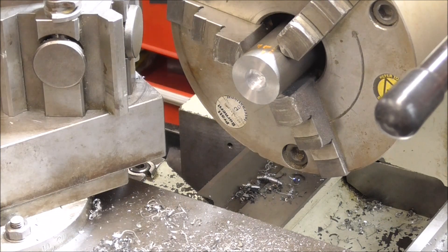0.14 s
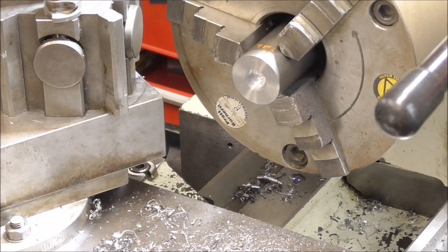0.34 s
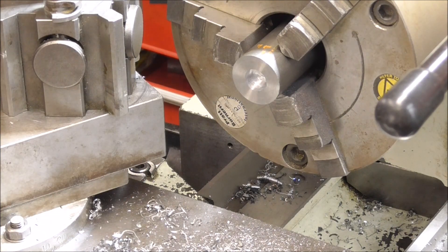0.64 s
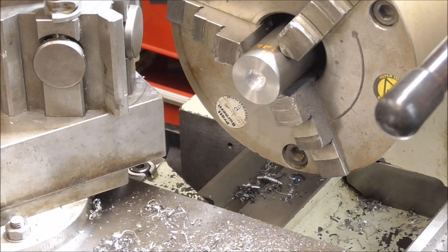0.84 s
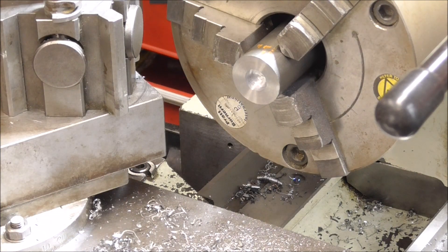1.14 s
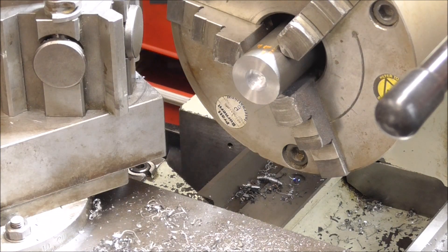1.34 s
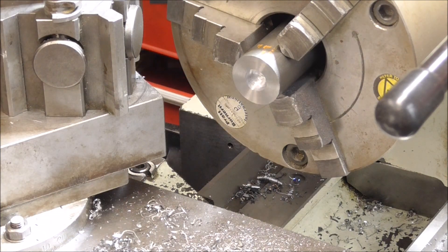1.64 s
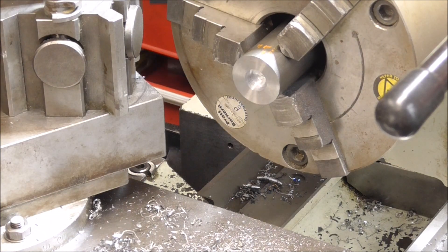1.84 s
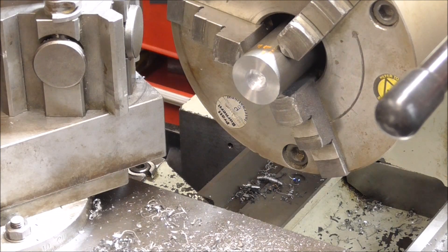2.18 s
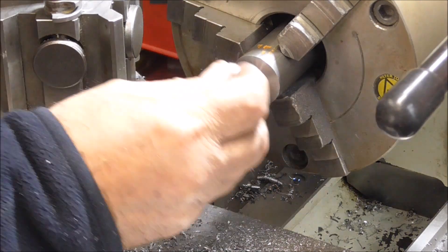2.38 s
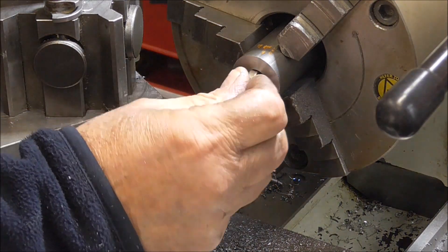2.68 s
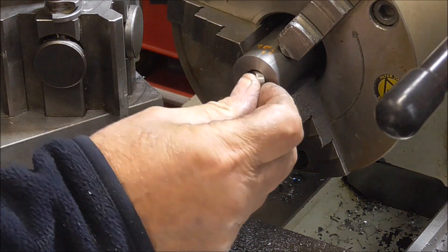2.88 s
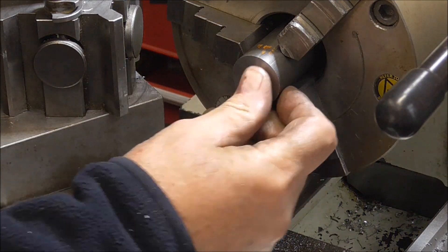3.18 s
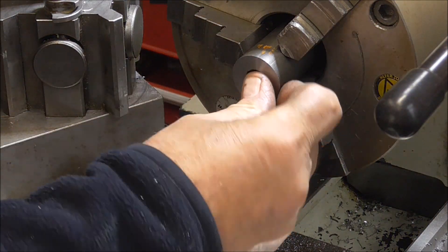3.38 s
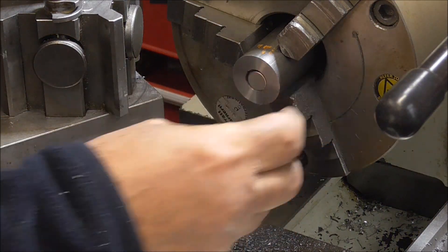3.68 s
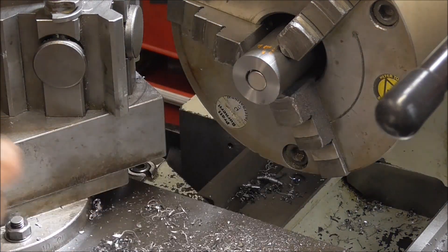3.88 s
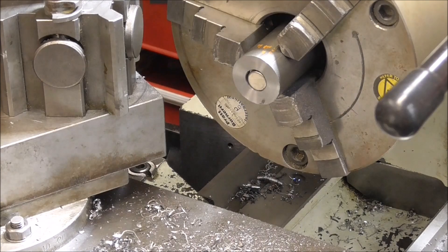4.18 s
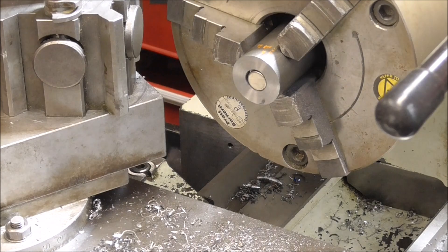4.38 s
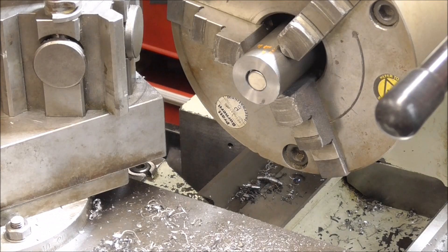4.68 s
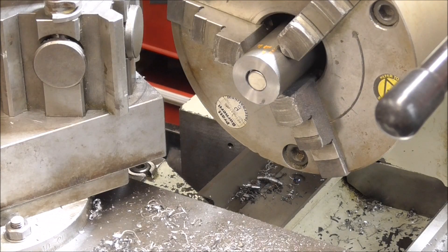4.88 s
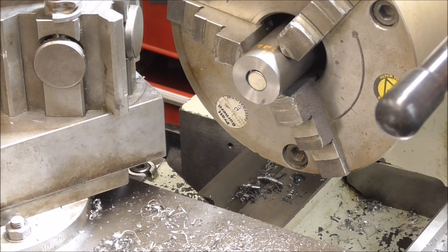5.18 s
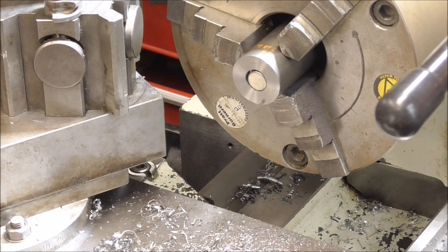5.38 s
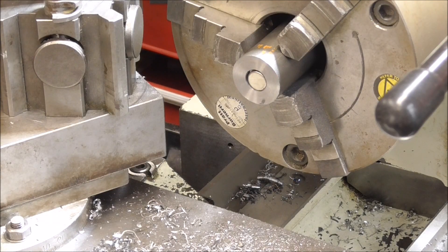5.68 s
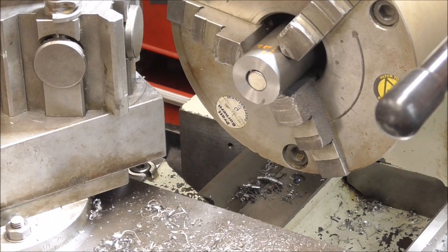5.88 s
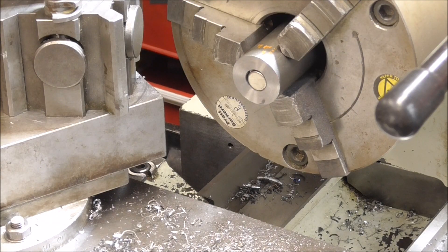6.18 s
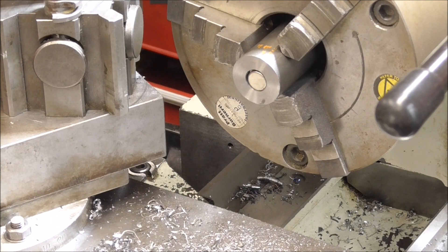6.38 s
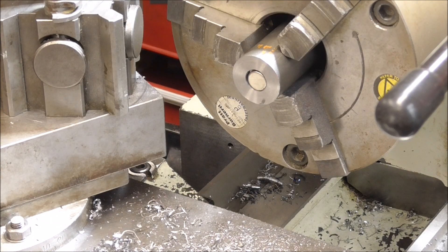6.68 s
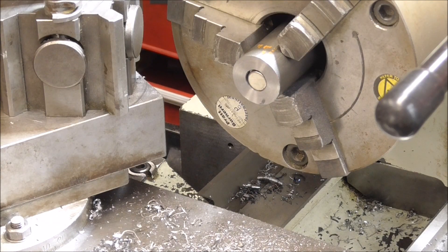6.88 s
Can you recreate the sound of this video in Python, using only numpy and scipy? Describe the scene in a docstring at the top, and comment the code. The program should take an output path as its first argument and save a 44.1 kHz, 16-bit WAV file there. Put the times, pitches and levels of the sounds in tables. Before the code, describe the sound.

A steady, low electric hum near 200 hertz fills the whole seven seconds, close by in a small, dry home workshop. Buzzing overtones beat slowly against one another, over a soft mid-range whirr and light microphone hiss; some upper tones swell gently in the second half. At about 0.2 seconds comes a faint tap, then between 0.33 and 0.45 a rough, dry clatter of loose steel tools, with weaker knocks around 0.55 to 0.6. A tiny tick and a dull soft knock occur near 1.5 to 1.6. While a hand fits a small metal piece into the stationary workpiece, minute bright chip ticks appear from 2.5 to 3.4, the sharpest at 3.0. A very faint, thin high ping sounds near 4.95 and one last tiny tick at 5.7. The hum persists unchanged to the end.

```python
"""A small electric motor hums steadily close at hand in a home workshop, with slow beats in its overtones.
The hum is a sum of sines at, or just under, multiples of a third of the mains frequency, over filtered-noise
whirr and hiss. Loose steel tools rattle on the bench early on, as bursts of damped modes in a short room; tiny
ticks of metal chips, millisecond noise bursts, and one thin ping follow. A limiter dips the level after sharp treble."""
import sys
import numpy as np
from scipy import signal
from scipy.fft import rfft, irfft
from scipy.io import wavfile
from scipy.ndimage import uniform_filter1d, minimum_filter1d

SR = 44100
rng = np.random.default_rng(int(sys.argv[2]) if len(sys.argv) > 2 else 0)


def int16_out(signal):
    """Quantize to a 16-bit WAV file."""
    q = np.round(np.clip(np.atleast_2d(signal).T, -1, 1) * 32767)
    wavfile.write(sys.argv[1], SR, q.astype(np.int16))


def linear_from_db(decibels):
    """Turn decibels (scalar or array-like) into linear amplitude factors; 0 gives 1."""
    return 10 ** (np.asarray(decibels, float) / 20)


N = 310023  # samples

# Base rate of the hum, one third of the mains frequency. Each row: time in seconds, rate in Hz.
BASE_RATE = [(0.0, 16.6336), (1.0, 16.6346), (2.0, 16.6362), (3.0, 16.637), (4.0, 16.6362), (5.0, 16.6363),
             (6.0, 16.6362), (7.0, 16.6372)]
# Strong hum lines at multiples of the base rate. Each row: multiple of the base rate, level in dB rms,
# left-right difference in dB, lead of the left channel in radians.
HUM = [(12, -49.4, 0, 0), (15, -85.8, 0, 0), (16, -77.7, 0, 0), (24, -67.0, -0.4, 0.1),
       (32, -85.3, -1.7, -0.3), (36, -74.1, 0.6, -0.5), (48, -67.7, 3.6, -0.1), (57, -86.5, -1.8, 0),
       (60, -64.1, -1.9, 0), (72, -74.9, -0.8, 0.4), (84, -73.8, -4.3, 0.1), (87, -84.3, -3.9, -0.2),
       (93, -85.7, 1.0, 0), (96, -85.2, -22.1, 2.1), (99, -84.9, -3.7, 0), (108, -76.2, -1.2, 0.3),
       (120, -79.9, -0.2, 0.1), (132, -80.8, -4.8, -1.3), (144, -87.7, 6.3, 0), (156, -88.0, 4.8, -0.7),
       (168, -89.3, 0.7, -0.5), (180, -94, -3, 0), (192, -93.9, 1.2, -0.2), (228, -92.5, -10.3, -0.3),
       (252, -85.6, -2.0, -0.2), (276, -93.5, -5.8, -0.3), (300, -92.5, -1.8, 0.2)]
# Lines just under a multiple of the base rate; most beat with the line there, some stand alone.
# Each row: multiple of the base rate, steps of the slip rate below it, level in dB rms,
# time in step with the multiple in seconds, left-right difference in dB.
LOW_LINES = [(30, 1, -74.7, 3.47, -1.3), (60, 3, -77.3, 4.0, -2.2), (69, 3, -85.5, 3.64, -2.3),
             (84, 3, -76.5, 3.21, -1.2), (90, 3, -86.5, 3.87, -7.2), (93, 3, -84.5, 3.59, 0.6),
             (96, 3, -72.0, 3.69, -3.1), (99, 3, -83.5, 3.59, -3.2), (102, 3, -88, 3.63, -1.3),
             (108, 3, -74.9, 3.96, -6.5), (114, 3, -85.5, 3.55, -1.4), (120, 3, -73.6, 4.08, -4.8),
             (120, 4, -85.3, 3.79, -4.2), (156, 3, -93, 3.73, -5.3), (168, 3, -82, 3.49, 0.2),
             (168, 6, -87.5, 3.45, 0.2)]
# Slipping lines that swell together. Each row: multiple of the base rate, level in dB from the common swell.
SWELL_LINES = [(99, -9), (105, 0), (111, -8), (117, -11)]

HUM_MULTIPLE = 12  # base cycles to one cycle period of the base: the 200 Hz mains hum tone
BURST_DELAY = 0.8  # share of a hum tone cycle
SLIP_HZ, MAIN_STEPS = 0.2565, 3  # one step of slip; most slipping lines lie this many steps down
FAINT_SIDE_DB, FAINT_LEAD = -2, -0.22  # left-right dB and left lead in rad of bearing and faint lines


def read(points, hz, column=1):
    """Linear interpolation of a spectrum table along a log-frequency axis."""
    table = np.array(points)
    return np.interp(np.log(hz + 1), np.log(table[:, 0] + 1), table[:, column])


def add(mix, s, sound, balance_db):
    """Superposition: a sound is laid into both channels with a level difference between them."""
    part = mix[:, round(s * SR):][:, :len(sound)]
    gains = linear_from_db(np.array([[balance_db / 2], [-balance_db / 2]]))
    part += gains * sound[:part.shape[1]]


def base_angle():
    """Phase is the time integral of frequency: the phase of the base rate in radians at every sample."""
    rate_hz = np.interp(np.arange(N) / SR, *np.transpose(BASE_RATE))
    return 2 * np.pi * np.cumsum(rate_hz) / SR


def tone(angle, db, balance_db, lead, waver_db=0.93):
    """Slow amplitude modulation of a sine that reaches two ports with differing level and phase."""
    knots = uniform_filter1d(rng.standard_normal(80), size=3) * np.sqrt(3)
    waver = np.interp(np.arange(N), np.linspace(0, N, len(knots)), linear_from_db(waver_db * knots))
    phasor = (waver * np.exp(1j * angle).astype(np.complex64)) * np.sqrt(2) * linear_from_db(db)
    left = linear_from_db(balance_db / 2) * np.exp(0.5j * lead)
    right = linear_from_db(-balance_db / 2) * np.exp(-0.5j * lead)
    # the stated level is that of the mean of both channels
    return np.array([(phasor * left).imag, (phasor * right).imag]) * 2 / abs(left + right)


def faint(angle, db):
    """Random scatter: a weak line whose level and phase lead vary about the rule."""
    level_scatter, _, lead_scatter = rng.standard_normal(size=3)
    return tone(angle, db + 3.0 * level_scatter, FAINT_SIDE_DB, FAINT_LEAD + 0.26 * lead_scatter)


def starting_phases():
    """Phase coherence: overtones loosely aligned in phase gather into one burst in every hum tone cycle."""
    # the burst falls near the trough of the hum tone
    burst = -2 * np.pi * BURST_DELAY * (np.arange(1000) / HUM_MULTIPLE - 1)
    chance = rng.standard_normal(1000)
    start = burst + 1.52 * chance  # rad of looseness
    slipping = burst + 0.4 * chance  # tighter: a flutter at a quarter of the hum tone's frequency
    for k, steps, _, in_step_s, _ in LOW_LINES:
        if steps == MAIN_STEPS:  # sets the phase that the low line has at its time in step
            start[k] = slipping[k] - 2 * np.pi * MAIN_STEPS * SLIP_HZ * in_step_s
    return start, slipping


def hum(base, start):
    """Harmonic synthesis: mains hum and its overtones are sines at exact multiples of one base rate."""
    early_lines = 60, 84, 108  # multiples that start 3 dB louder and settle
    early = linear_from_db(np.interp(np.arange(N) / SR, [0.76, 2.4], [3.0, 0]))
    out = np.zeros((2, N))
    for k, db, side, lead in HUM:
        waver_db = 0 if k == HUM_MULTIPLE else 0.93  # the hum tone itself is steady
        line = tone(k * base + start[k], db, side, lead, waver_db)
        out += line * early if k in early_lines else line
    return out


def low_lines(base, start):
    """Beating: a line just under a multiple drifts in and out of phase with any line that stands there."""
    t = np.arange(N) / SR
    out = np.zeros((2, N))
    for k, steps, db, in_step_s, side in LOW_LINES:
        lag = 2 * np.pi * steps * SLIP_HZ * (t - in_step_s)
        out += tone(k * base + start[k] - lag, db, side, 0.1)
    return out


def swelling_lines(base, slipping):
    """Common amplitude modulation: one envelope raises and lowers a group of slipping lines."""
    # Level of a line at 0 dB from the swell. Each row: time in seconds, level in dB rms.
    swell_levels = [(0, -84), (1, -82), (2.4, -88), (3.5, -86), (4.2, -78.5), (5.2, -77), (6.4, -73.5),
                    (7, -75)]
    t = np.arange(N) / SR
    lag = 2 * np.pi * MAIN_STEPS * SLIP_HZ * t
    lines = sum(tone(k * base + slipping[k] - lag, db, -1.2, -0.7) for k, db in SWELL_LINES)
    return linear_from_db(np.interp(t, *np.transpose(swell_levels))) * lines


def bearing_whine(base, start):
    """Ball-pass harmonics: balls passing a bearing race give lines at multiples of the ball rate."""
    # The clearest lines. Each row: multiple of the ball rate, level in dB rms.
    clear_lines = [(17, -97.6), (35, -96.8), (37, -91.3), (38, -97.5)]
    balls = 9.2711 * base  # ball rate in base rates
    # start[-k] takes phases from the far end of the list
    out = sum(tone(k * balls + start[-k], db, FAINT_SIDE_DB, FAINT_LEAD) for k, db in clear_lines)
    for k in range(31, 56):
        if k not in dict(clear_lines):
            out += faint(k * balls + start[-k], -103.0)
    return out


def faint_overtones(base, start):
    """Harmonic series: weak lines at multiples of the hum tone and of a quarter of it, the mains frequency."""
    # Mean levels at the hum tone's multiples. Each row: frequency in Hz, level in dB rms.
    hum_levels = [(3000, -96.5), (5400, -99), (6000, -104), (9000, -106), (13000, -107), (15000, -104)]
    # Mean levels at the mains multiples. Each row: frequency in Hz, level in dB rms.
    mains_levels = [(350, -93), (550, -88), (1100, -93), (1500, -88), (1900, -96), (2100, -100),
                    (2850, -94), (3150, -108), (3700, -108), (4000, -102)]
    strong = [row[0] for row in HUM + LOW_LINES + SWELL_LINES]
    mains = [k for k in range(21, 246, 3) if k % HUM_MULTIPLE and k not in strong]
    overtones = [k for k in range(HUM_MULTIPLE, 950, HUM_MULTIPLE) if k not in strong]
    out = np.zeros((2, N))
    for multiples, levels in (mains, mains_levels), (overtones, hum_levels):
        for k in multiples:
            out += faint(k * base + start[k], read(levels, k * BASE_RATE[0][1]))
    return out


def motor():
    """Superposition of lines that all derive from one base phase; some slip slowly behind its multiples."""
    base = base_angle()
    start, slipping = starting_phases()
    out = hum(base, start) + low_lines(base, start)
    out += swelling_lines(base, slipping)
    return out + bearing_whine(base, start) + faint_overtones(base, start)


def whirr():
    """Resonant filtering: air and bearing noise shaped by the housing, coherent between both ports."""
    # Noise density before the housing. Each row: frequency in Hz, level in dB per Hz.
    density = [(25, -113), (100, -111), (180, -103), (300, -104), (450, -102), (900, -103), (1700, -104),
               (2300, -108), (2900, -113), (3500, -125), (5000, -124), (9000, -127), (10500, -134),
               (15500, -132)]
    # Housing response, lifts and one dip. Each row: centre in Hz, width in Hz, gain in dB.
    housing = [(715, 44, 4), (1040, 110, 2.5), (1382, 230, 6.5), (2000, 230, 5), (2066, 59, -5),
               (4000, 250, 7.5), (5770, 1300, 1.5), (8850, 920, 6.5)]
    # Port difference. Each row: frequency in Hz, left-right difference in dB, left lead in radians.
    stereo = [(193, 8.5, 0), (690, 2, -0.33), (1300, -6, -.2), (2960, -5, 0.048), (11930, -4.5, -0.31)]
    hz = np.fft.rfftfreq(N, 1 / SR)
    noise = rfft(rng.standard_normal(N)) * np.sqrt(SR / 2)
    lift_db = sum(db / (1 + (2 * (hz - f) / width) ** 2) for f, width, db in housing)
    shared = noise * linear_from_db(read(density, hz) + lift_db)
    tilt = linear_from_db(read(stereo, hz) / 2) * np.exp(0.5j * read(stereo, hz, column=2))
    # throb at the hum tone's frequency
    throb = 1 + 0.08 * np.cos(HUM_MULTIPLE * base_angle() - 2 * np.pi * BURST_DELAY)
    return throb * irfft(np.array([shared * tilt, shared / tilt]), N)


def hiss():
    """Uncorrelated noise: microphone hiss is independent in left and right."""
    # Noise density. Each row: frequency in Hz, level in dB per Hz.
    density = [(25, -110), (100, -110), (250, -112), (600, -108), (1500, -107), (2500, -113), (3500, -122),
               (8000, -123), (11000, -125), (15500, -123)]
    noise = rfft(rng.standard_normal((2, N))) * np.sqrt(SR / 2)
    return irfft(noise * linear_from_db(read(density, np.fft.rfftfreq(N, 1 / SR))), N)


def tool(mix):
    """Modal excitation: each knock chatters in tiny bounces, ringing modes near its colour in a rough burst."""
    # Modes of the loose steel tools. Each row: nominal frequency in Hz, relative level in dB,
    # undamped 60 dB decay time in seconds.
    modes = [(633, 18, 0.049), (1143, 10, 0.054), (1575, -1, 0.11), (1750, 2, 0.079), (2290, -3, 0.16),
             (2800, 2.5, 0.061), (3120, -9, 0.053), (4080, -15, 0.095), (5070, -22, 0.014),
             (6570, -19, 0.1), (6550, -11, 0.069), (7780, -16.5, 0.12), (9000, -9, 0.038),
             (11140, -8, 0.046), (14600, -11, .03)]
    # Knocks and rattles. Each row: start in seconds, level in dB (6 dB over the rms of the first 200 samples),
    # centre of the blow's colour in Hz, width in octaves.
    knocks = [(.181, -53.5, 795, 0.28), (.185, -55, 1800, .2), (.3337, -44.5, 6400, 1.1),
              (.335, -44.5, 3170, 0.91), (.346, -45, 2500, .5), (0.3802, -44.5, 6000, 1.27),
              (0.384, -38, 1770, 0.43), (.393, -46, 2000, .58), (.403, -41, 1750, 0.9),
              (0.409, -49, 6000, 0.82), (0.418, -41.5, 1300, 0.51), (0.426, -54, 2400, .5),
              (0.43, -56, 1830, 0.51), (.45, -66, 2000, 0.35), (.55, -55, 1300, 0.71),
              (.585, -52.5, 990, 0.45), (.612, -56, 1100, 0.36), (1.616, -56.5, 500, 0.55)]
    damping = 0.64  # the bench shortens every decay time by this factor
    bounces_per_s = 400
    t = np.arange(SR // 5) / SR
    bins = np.fft.rfftfreq(len(t), 1 / SR) + 1
    high_pass = signal.butter(2, 300, 'high', fs=SR)
    for s, db, centre_hz, octaves in knocks:
        ring = np.zeros(len(t))
        for hz, mode_db, t60 in modes:
            reach = np.exp(-0.5 * (np.log2(hz / centre_hz) / octaves) ** 2)
            rough = 1 + 0.62 * uniform_filter1d(rng.standard_normal(len(t)), size=60) * np.sqrt(60)
            turns = hz * rng.uniform(0.92, 1.04) * t
            decay = linear_from_db(mode_db - 60 * t / (t60 * damping))
            ring += reach * decay * rough * np.sin(2 * np.pi * turns)
        colour = np.exp(-0.5 * (np.log2(bins / centre_hz) / octaves) ** 2) * (bins > 400)
        burst = irfft(rfft(rng.standard_normal(len(t))) * colour, len(t))
        burst_decay = linear_from_db(-60 * t / (0.065 * damping))
        ring += 0.71 * burst * burst_decay * np.std(ring[:200]) / np.std(burst)
        struck = rng.random(len(t)) < bounces_per_s / SR
        bounces = struck * rng.random(len(t)) * np.exp(-t / 0.02) * 0.59
        bounces[0] = 1
        ring *= np.minimum(t * centre_hz / 0.98, 1)  # dull blows start softer
        chatter = signal.fftconvolve(ring, bounces)[:len(t)]
        chatter = signal.lfilter(*high_pass, chatter)
        add(mix, s, linear_from_db(db) * chatter / np.std(chatter[:200]) / 2, -1.3)
    return mix


def workshop(x):
    """Diffuse reverberation: a short cluttered room as decaying noise, independent in each channel."""
    t = np.arange(SR // 3) / SR
    t60 = 0.07  # s
    tail = rng.standard_normal((2, len(t))) * linear_from_db(-60 * t / t60) * (t > 0.003)
    return signal.fftconvolve(x, tail / np.linalg.norm(tail[0]), axes=1)[:, :N]


def chips(mix):
    """Time-bandwidth reciprocity: ticks are treble bursts, narrow ones rising slower; the ping is one mode."""
    # Dry ticks of metal chips. Each row: start in seconds, peak in dB, centre in Hz, width in Hz,
    # left-right difference in dB.
    ticks = [(1.5415, -57, 9500, 9000, -1), (1.542, -66, 6400, 800, -1), (2.497, -62, 13000, 4000, -.5),
             (2.7195, -71, 11000, 4000, -.5), (2.7455, -58.5, 12500, 7000, 5),
             (2.9455, -66, 12500, 5000, -.5), (2.952, -69, 12300, 1500, -.5),
             (3.0185, -55.5, 10500, 2000, 4), (3.020, -43, 13100, 2070, -1), (3.023, -60, 14500, 2500, 8),
             (3.021, -58, 7300, 1500, -4), (3.406, -63, 13000, 6000, 0), (5.685, -68, 12500, 6000, 0)]
    # A chip that sings. Each row: start in seconds, level in dB, frequency in Hz, length in seconds.
    pings = [(4.95, -76, 11700, .04)]
    t = np.arange(SR // 20) / SR
    hz = np.fft.rfftfreq(len(t), 1 / SR)
    for s, db, centre_hz, width_hz, side in ticks:
        colour = np.exp(-2 * ((hz - centre_hz) / width_hz) ** 2)
        band = irfft(rfft(rng.standard_normal(len(t))) * colour, len(t))
        tick = band * np.minimum(t * width_hz / 1.6, 1) * np.exp(-t / 0.0026)
        add(mix, s, linear_from_db(db) * tick / abs(tick).max(), side)
    for s, db, ping_hz, length in pings:
        shape = np.minimum(t / 0.003, 1) * np.clip(1 - t / length, 0, 1) ** 0.4
        add(mix, s, linear_from_db(db) * np.sin(2 * np.pi * ping_hz * t) * shape, -2)
    return mix


def scene():
    """Superposition of motor, noise, struck metal and room; chips stir the room less than the tools."""
    tools = tool(np.zeros((2, N)))
    ticks = chips(np.zeros((2, N)))
    direct = motor() + whirr() + hiss() + tools + ticks
    room = linear_from_db(-8) * workshop(tools + linear_from_db(-10) * ticks)
    return direct + room


def top_cut(x):
    """Nothing passes above the cut-off."""
    return signal.sosfilt(signal.butter(12, 15830, fs=SR, output="sos"), x)


def record(dry):
    """Dynamic range limiting: a treble-boosted level drives a quick fall, short hold and two-speed recovery."""
    boosted = signal.lfilter([1, -0.95], [1], dry.mean(0)) * 1.81
    power = uniform_filter1d(boosted ** 2, size=60, origin=29)  # over the last 60 samples
    level_db = 10 * np.log10(abs(power) + 1e-14)
    over_db = 0.96 * np.maximum(level_db + 51.5, 1e-6)
    held_db = -minimum_filter1d(-over_db, size=441, origin=220)  # 10 ms hold
    # exponential recovery, time constant 36 ms
    fall = np.arange(N) / SR / 0.036
    cut_db = np.exp(np.maximum.accumulate(np.log(held_db) + fall) - fall)
    # slower recovery after a long overload, time constant 90 ms
    memory = np.exp(-1 / (0.09 * SR))
    slow_db = 1.2 * signal.lfilter([1 - memory], [1, -memory], cut_db)
    cut_db = np.maximum(cut_db, slow_db)
    cut_db = np.maximum(1.11 * cut_db - 1.0, 0)  # lets go fully near the end of the recovery
    for _ in range(2):  # smooths the onset of the gain change
        cut_db = uniform_filter1d(cut_db, size=50, origin=24)
    return top_cut(dry / linear_from_db(cut_db))


dry = scene()
out = record(dry)
int16_out(out)
```